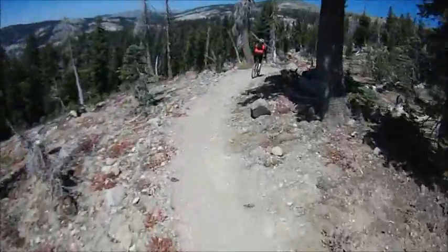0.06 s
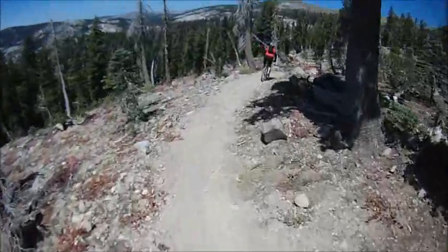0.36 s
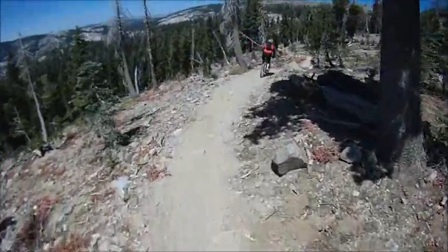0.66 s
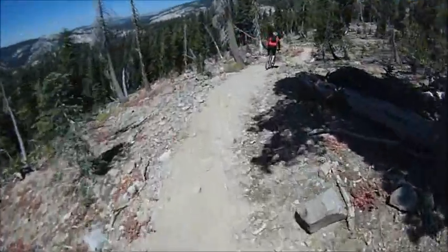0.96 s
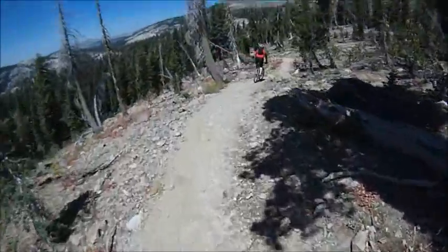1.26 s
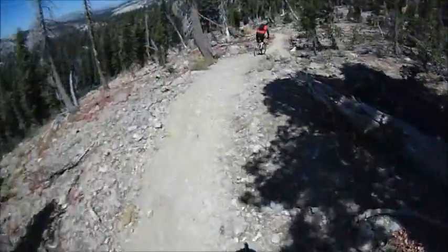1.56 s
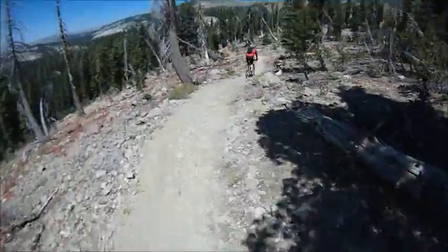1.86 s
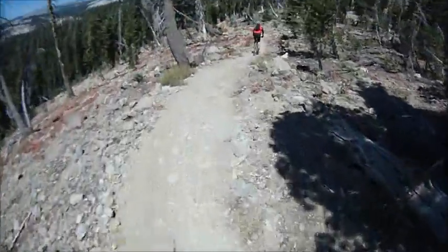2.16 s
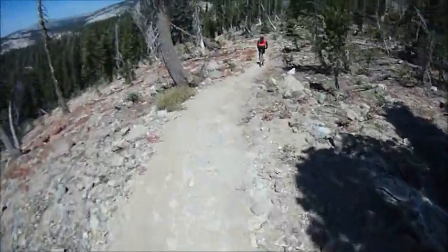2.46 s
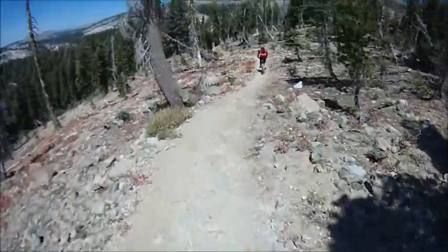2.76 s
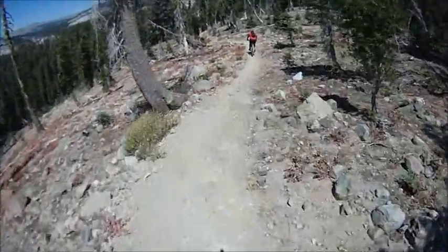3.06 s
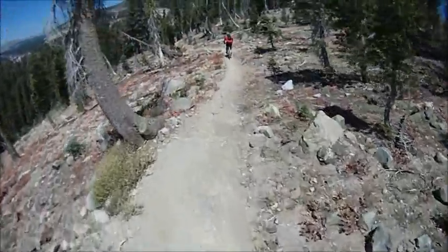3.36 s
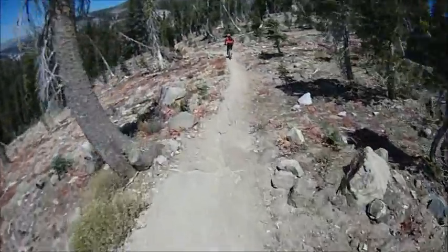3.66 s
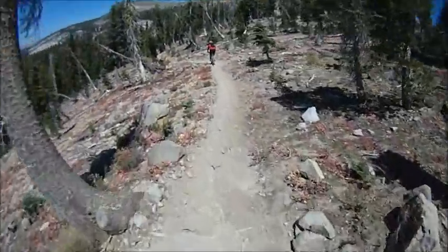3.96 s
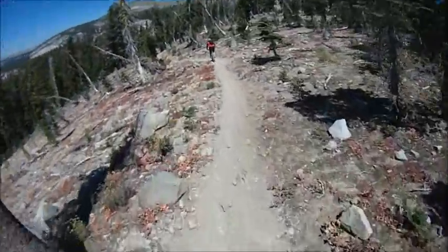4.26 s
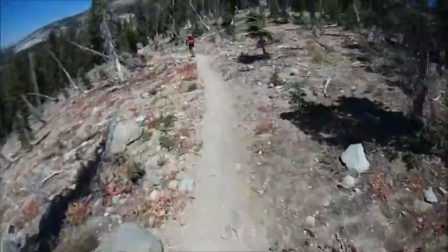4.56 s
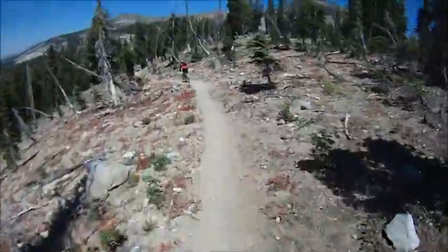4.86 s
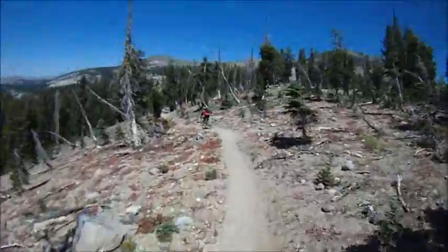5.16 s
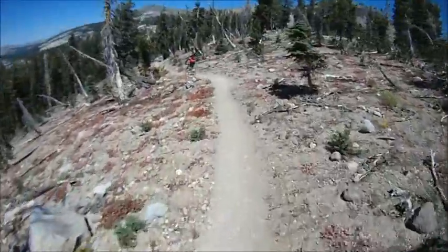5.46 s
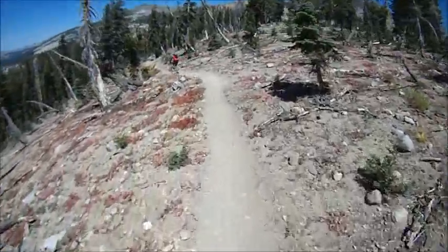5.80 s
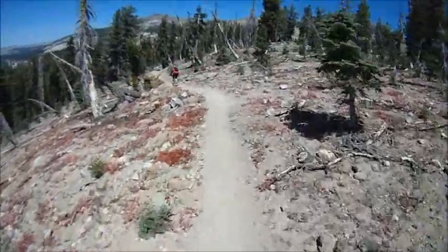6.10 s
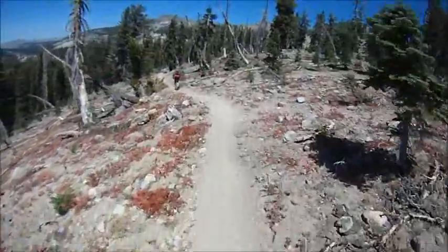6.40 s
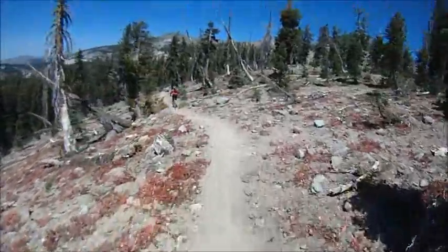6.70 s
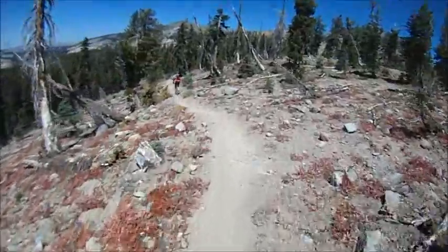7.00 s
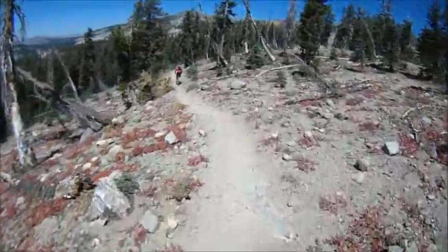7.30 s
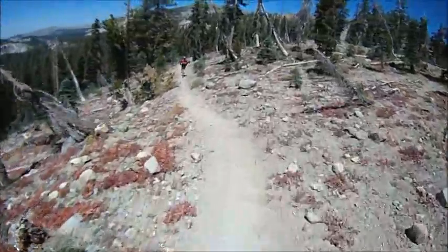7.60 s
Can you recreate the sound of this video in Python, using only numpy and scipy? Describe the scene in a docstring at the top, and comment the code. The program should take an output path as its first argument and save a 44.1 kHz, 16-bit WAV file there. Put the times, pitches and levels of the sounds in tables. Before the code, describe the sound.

Bike tyres grind over loose stones with clacks, thumps and rattles, between two spells of gusty wind on the microphone.

```python
"""A mountain bike runs down a dry gravel trail, heard from a cased camera on the rider.
At first, gusts batter the case with pops and short whistles while the tyres rumble and crunch.
From about 1 to 6 seconds, stones snap under the tread and knock the frame, the wheels thump into
ruts, the chain ticks and a hollow note rings after jolts. At about 6.5 seconds the gusts return.
A soft rush of air and a thin hiss lie under the whole ride."""
import sys
import numpy as np
from scipy import signal
from scipy.fft import rfft, irfft, next_fast_len
from scipy.io import wavfile
from scipy.ndimage import uniform_filter1d, map_coordinates

SR = 44100
rng = np.random.default_rng(int(sys.argv[2]) if len(sys.argv) > 2 else 0)


def bounce(signal):
    """Save signal as a 16-bit WAV file at the path given by the first command-line argument."""
    frames = np.transpose(np.atleast_2d(signal))
    limited = np.clip(frames, -1, 1)
    pcm = np.round(limited * 32767).astype(np.int16)
    wavfile.write(sys.argv[1], SR, pcm)


N = 341330
TIME = np.arange(N) / SR

# Levels in the tables are in decibels; some sources add an overall level of their own.
# how rough the trail is: (time [s], level [dB])
ROUGHNESS = [(0, -36.5), (.3, -38.5), (1.2, -36.5), (1.55, -40.5), (2.4, -39.5), (2.85, -39.5), (3.33, -45),
             (3.8, -41), (4.1, -41.5), (4.55, -40), (4.95, -46.5), (5.19, -45.5), (5.26, -38), (5.7, -39.5),
             (6.33, -37), (6.45, -32), (6.8, -38), (7.35, -32), (7.6, -40.5)]
# single bumps shake the bike: (time [s], level [dB])
BUMPS = [(.04, -37), (0.201, -36), (.3, -32.5), (.74, -34), (.85, -38.5), (1.05, -33), (1.169, -32.5),
         (1.66, -35.5), (1.79, -34), (2.049, -37), (2.24, -38), (2.679, -36.5), (3.091, -34), (3.19, -35.5),
         (3.409, -37), (3.6, -38.5), (3.905, -32.5), (4.315, -41.5), (4.37, -34.5), (4.47, -35.5),
         (4.53, -36.5), (5.88, -32.5), (5.975, -33.5), (6.17, -37), (7.05, -32), (7.31, -35), (7.42, -36)]
# how deep the loose gravel lies: (time [s], level [dB])
LOOSE_GRAVEL = [(0, -59.5), (.45, -66), (.8, -61), (1.35, -54.5), (2.3, -54), (2.5, -58), (3.25, -57.5),
                (3.65, -61), (3.95, -56.5), (4.78, -63.5), (5.3, -55.5), (5.6, -59.5), (5.74, -51),
                (6.39, -57), (6.7, -60.5)]
# the tread scatters a patch of stones: (time [s], length [s], level [dB])
SPRAYS = [(.73, 0.091, -56.5), (1.37, 0.02, -47), (1.435, 0.034, -47.5), (1.48, 0.047, -50),
          (1.82, 0.046, -52.5), (2.255, 0.078, -51), (3.105, 0.069, -52.5), (3.34, 0.078, -52),
          (3.56, 0.065, -55), (3.715, 0.041, -54), (3.92, 0.018, -50), (4.515, 0.071, -58),
          (4.9, 0.036, -52.5), (5.655, 0.024, -59), (5.97, 0.037, -51)]
# tone of the tyres' rumble, grind and crunch: (frequency [Hz], level [dB])
RUMBLE_SPECTRUM = [(20, -34), (45, -22.5), (80, -4.5), (160, 1.5), (280, 2), (380, -1.5), (520, -6.5),
                   (750, -14.5), (1200, -30.5), (3000, -84)]
GRIND_SPECTRUM = [(150, -19.5), (450, 5.5), (800, 1.5), (1200, -9), (1700, -11.5), (3000, -53)]
CRUNCH_SPECTRUM = [(300, -14), (800, -2), (1200, 0), (1700, -5), (2300, -12), (3000, -19.5), (4200, -29.5),
                   (7000, -44), (15000, -45)]
# pitches that the hollow bike and the case boost: (frequency [Hz], width [Hz], boost [dB])
BIKE_RESONANCES = [(414.5, 49, 13.5), (954, 67, 5)]
CASE_RESONANCES = [(920, 117, 10.5), (2220, 210, 4.5), (3450, 150, 8), (4700, 730, 5)]
# single stones snap out from under the tread: (time [s], level [dB], pitch [Hz])
STONE_SNAPS = [(1.714, -40, 1540), (1.983, -33, 1660), (2.009, -34.5, 1250), (2.048, -36, 1050),
               (2.081, -35, 1600), (2.183, -34.5, 1600), (2.279, -31.5, 1320), (2.347, -37, 1570),
               (2.386, -41, 1690), (2.689, -38, 1580), (3.0186, -36, 1850), (3.12, -34.5, 1700),
               (3.133, -35, 1460), (3.168, -34.5, 1470), (3.398, -38, 1200), (3.816, -38, 1720),
               (3.870, -34, 1600), (4.559, -40, 2200), (5.113, -36, 1440), (5.6521, -34, 1800),
               (5.986, -36, 1600), (6.031, -32.5, 1290)]
# stones and loose parts hit the frame: (time [s], level [dB], crack offset [dB], own pitch [Hz])
KNOCKS = [(1.3795, -15, -31, 923), (1.446, -24.5, -16, 880), (1.461, -28, -16, 1086),
          (1.7735, -17.5, -14.5, 973), (2.492, -28, -34, 945), (2.754, -28, -15, 950),
          (2.803, -35.5, -13, 830), (2.955, -30, -33, 930), (3.116, -31, -22, 884),
          (3.375, -30.5, -20, 1100), (3.541, -31, -16, 900), (3.721, -25.5, -31, 925),
          (4.519, -31.5, -13, 670), (4.531, -31.5, -24, 810), (4.704, -36, -20, 1270),
          (4.868, -34.5, -32, 753), (5.247, -34.5, -24, 805), (5.326, -30, -22, 680),
          (5.648, -24.5, -12, 1234), (5.657, -27.5, -19, 784), (6.117, -23, -18.5, 1005)]
# the notes of the struck frame: (pitch [Hz], level [dB], time to fade by 60 dB [s])
FRAME_MODES = [(408.6, -12.5, 0.23), (656, -7, 0.033), (945, -13, 0.11), (1203, -16.5, 0.087),
               (1572, -20.5, 0.055)]
# the wheels drop into ruts: (time [s], level [dB])
THUMPS = [(1.3792, -25), (1.437, -24.5), (1.827, -22.5), (2.685, -27), (2.899, -28), (2.986, -25),
          (3.003, -27), (3.428, -30.5), (3.716, -23.5), (4.325, -22), (4.389, -20), (4.44, -25.5),
          (4.519, -27), (4.745, -30), (5.639, -22), (5.875, -22.5)]
# jolts make the bike sound its hollow note: (time [s], length [s], level [dB])
JOLTS = [(1.353, 0.058, -27.5), (2.263, 0.072, -29), (2.341, 0.17, -34.5), (2.501, 0.11, -25),
         (2.675, 0.081, -27), (3.156, 0.086, -32), (3.242, 0.14, -33), (3.863, 0.26, -35),
         (4.295, 0.08, -32.5), (5.423, 0.059, -29), (5.66, 0.14, -34.5), (5.968, 0.052, -27.5)]
# chain and grit tick on the bike: (time [s], snap level [dB], treble level [dB])
TICKS = [(0.933, -52, -66), (1.201, -45, -77), (1.3747, -42, -62), (1.437, -40, -69), (1.828, -45, -64),
         (2.2606, -47, -66), (3.7494, -52, -69), (3.816, -43.5, -71), (3.871, -44.5, -75),
         (4.389, -46.5, -74), (4.9157, -46, -67), (4.9914, -48, -71), (5.65, -40, -71), (5.8356, -46, -72)]
# a spoke or brake disc pings: (time [s], pitch [Hz], level [dB])
PINGS = [(0.934, 3210, -49.5), (.934, 11500, -63), (1.376, 6640, -57), (1.460, 4650, -54),
         (1.828, 5140, -56), (2.262, 5060, -56), (2.296, 3500, -49), (4.532, 3440, -45)]
# gusts hit the case: (time [s], length [s], level [dB], sputter offset [dB])
GUSTS = [(.04, 0.058, -40, -6), (0.197, 0.176, -37.5, -4.5), (0.396, 0.398, -40.5, -8),
         (6.453, .1, -33.5, -4.5), (6.553, 0.141, -36.5, -3), (6.722, 0.017, -47, 8.5),
         (6.829, 0.058, -39, -10), (6.882, 0.066, -35.5, -1.5), (7.038, 0.036, -44.5, -3),
         (7.12, 0.077, -34.5, -1), (7.215, 0.261, -34, -3.5), (7.565, 0.024, -42.5, -3),
         (7.711, .036, -31, -11)]
# tone of the gusts' dull roar and sharp sputter: (frequency [Hz], level [dB])
ROAR_SPECTRUM = [(60, -30.5), (150, 0.5), (300, 4), (500, 3.5), (800, -5), (1250, -13.5), (1700, -41),
                 (2300, -40.5), (4000, -55), (8000, -102)]
SPUTTER_SPECTRUM = [(100, -21), (400, -1), (800, 6.5), (1300, -2), (1750, -15), (2250, -34.5), (4000, -60),
                    (8000, -74)]
# the hardest swirls of air slap the case: (time [s], level [dB])
SLAPS = [(.061, -22.5), (.081, -17.5), (.2185, -28), (.232, -27), (0.2859, -19), (.324, -24),
         (.3765, -20.5), (.739, -20), (6.481, -20), (6.534, -19), (6.5382, -21), (6.772, -24), (6.928, -18),
         (7.163, -19), (7.2447, -16.5), (7.301, -22), (7.4598, -17), (7.471, -18.5)]
# air whistles at an edge: (time [s], length [s], first pitch [Hz], last pitch [Hz], level [dB])
WHISTLES = [(0.049, 0.047, 489, 389, -27), (0.493, 0.065, 675, 698, -31.5),
            (1.052, 0.0235, 200, 696, -26.5), (6.851, 0.03, 850, 1160, -33.5),
            (7.122, 0.04, 1266, 1360, -34.5), (7.213, 0.043, 1222, 1090, -30.5),
            (7.509, 0.014, 900, 870, -27), (7.566, 0.039, 440, 690, -26.5), (7.618, 0.061, 740, 682, -31.5)]
# tone of the steady airflow and of the hiss: (frequency [Hz], level [dB])
AIRFLOW_SPECTRUM = [(15, -9.5), (80, 2), (140, -4), (400, -19), (2000, -88)]
HISS_SPECTRUM = [(500, 7.5), (3000, 3.5), (6000, 2.5), (9000, -0.5), (15000, -2)]
# how loud the hiss is: (time [s], level [dB])
HISS_LEVELS = [(0, -75), (.43, -80.5), (.8, -74), (1.26, -74), (1.7, -71), (3.95, -71.5), (4.75, -75.5),
               (5.33, -72), (5.8, -72.5), (6.28, -71), (6.58, -77), (7.5, -76)]


def shaking():
    """How hard the ground shakes the bike: the trail's roughness plus single bumps."""
    bumps = swells([(s, 0.035, db) for s, db in BUMPS], attack_s=0.0092, release_s=0.043)
    return np.hypot(amp(curve(ROUGHNESS)), bumps)


def moving_gravel():
    """How much gravel moves: the loose layer plus scattered patches of stones."""
    return np.hypot(amp(curve(LOOSE_GRAVEL)), swells(SPRAYS, attack_s=0.0025, release_s=0.015))


def tyre_rumble(shake, level_db=-0.93, judder_db=0.87):
    """Tyre knobs and bumps shake the bike, and the shaking travels up through the rider's mount."""
    knobs = coloured(impacts(rate=1500, spread_db=2.5), RUMBLE_SPECTRUM)
    return amp(level_db) * shake * unit(knobs * amp(judder_db * wobble(35)))


def tyre_grind(shake, gravel, level_db=2, shake_share=0.58, clump_db=1.0):
    """The tread presses stones into the dirt, harder on bumps and in deep gravel."""
    stones = impacts(rate=500, spread_db=1.5) + 0.5 * rng.standard_normal(N)
    clumps = stones * amp(clump_db * wobble(45))
    pressure = shake ** shake_share * gravel ** (1 - shake_share)
    return amp(level_db) * pressure * unit(coloured(clumps, GRIND_SPECTRUM, BIKE_RESONANCES))


def gravel_crunch(gravel, level_db=6, clump_db=1.75):
    """Grit snaps under the tread in clumps over a bed of sand, its tone always shifting."""
    grit = impacts(rate=650, spread_db=5) + 0.7 * rng.standard_normal(N)
    snaps = coloured(grit * amp(clump_db * wobble(55)), CRUNCH_SPECTRUM, CASE_RESONANCES)
    return amp(level_db) * gravel * unit(patchy(snaps, depth_db=2.5))


def stone_snaps(t60=0.021):
    """A pinched stone lets go with a dry clack: two short notes and a puff of grit."""
    out, t = np.zeros(N), TIME[:SR // 16]
    for s, db, hz in STONE_SNAPS:
        overtone = 0.39 * mode(t, hz * (1.3 + 0.15 * rng.standard_normal()), t60)
        grit = burst(t, lo_hz=hz / 2, hi_hz=hz * 1.17, t60=0.032)
        clack = (mode(t, hz, t60) + overtone + grit) * fade_in(t, 0.00057)
        add(out, s, amp(db) * unit_peak(clack))
    return out


def frame_knocks(crack_db=2, rebound_s=0.0052, rebound_db=-3):
    """Each blow rings the loose part and the frame; the part cracks against it and bounces once."""
    out, t = np.zeros(N), TIME[:SR // 4]
    for s, db, offset_db, own_hz in KNOCKS:
        ringing = 0.63 * mode(t, own_hz, t60=0.032)
        for hz, mode_db, t60 in FRAME_MODES:
            strength, detune = rng.standard_normal(2)  # no two blows sound alike
            ringing += amp(mode_db + 2 * strength) * mode(t, hz * (1 + 0.021 * detune), t60)
        ringing *= fade_in(t, 0.00052) ** 2  # a blunt contact builds up softly
        add(out, s, amp(db) * unit_peak(ringing))
        for contact in range(2):
            crack = burst(t, lo_hz=1160, hi_hz=2320, t60=0.023)
            add(out, s + contact * rebound_s, amp(db + offset_db + crack_db + contact * rebound_db) * crack)
    return out


def rut_thumps(level_db=-2, typical_hz=390):
    """A wheel drops with a dull jolt: one short push, then the suspension shudders."""
    out, t = np.zeros(N), TIME[:SR // 4]
    for s, db in THUMPS:
        hz = typical_hz * np.exp(0.15 * rng.standard_normal())
        push = mode(t, hz, t60=0.016) * fade_in(t, 0.002) ** 2
        shudder = 0.63 * burst(t, lo_hz=153, hi_hz=487, t60=0.088)
        add(out, s, amp(db + level_db) * (unit_peak(push) + shudder))
    return out


def hollow_ring(hz=417, waver_hz=9, level_db=-2, flutter_db=2.5):
    """The bike's hollow note swells quickly after a jolt and sinks more slowly."""
    loudness = np.zeros(N)
    for s, length, db in JOLTS:
        age = np.linspace(0, 1, int(length * SR))
        add(loudness, s, amp(db + level_db) * np.sin(np.pi * age ** 0.41))
    return loudness * tone(hz + waver_hz * wobble(50)) * amp(flutter_db * wobble(50))


def chain_ticks(snap_gain_db=-3, treble_gain_db=11):
    """Chain and grit tap the bike: a dry snap with a bright top."""
    out, t = np.zeros(N), TIME[:SR // 8]
    for s, snap_db, treble_db in TICKS:
        snap = burst(t, lo_hz=1800, hi_hz=4000, t60=0.025)
        treble = burst(t, lo_hz=4200, hi_hz=11500, t60=0.03, order=4)
        add(out, s, amp(snap_db + snap_gain_db) * snap + amp(treble_db + treble_gain_db) * treble)
    return out


def metal_pings(waver=0.023, t60=0.05):
    """A spoke or brake disc rings briefly; an unsteady pitch makes it gritty."""
    out, t = np.zeros(N), TIME[:SR // 8]
    for s, hz, db in PINGS:
        jitter = unit(uniform_filter1d(rng.standard_normal(len(t)), size=32))
        loudness = amp(db - 60 * t / t60) * fade_in(t, 0.001)
        add(out, s, loudness * tone(hz * (1 + waver * jitter)))
    return out


def wind_gusts(roar_db=2.5, flutter_db=0.45):
    """Swirls of air batter the case: a dull, fluttering roar with a sharper sputter."""
    swirls = impacts(rate=1400, spread_db=5) + 0.5 * rng.standard_normal(N)
    roar = coloured(swirls, ROAR_SPECTRUM)
    sputter = coloured(impacts(rate=170, spread_db=1.5), SPUTTER_SPECTRUM)
    dull = [(s, length, db + roar_db) for s, length, db, _ in GUSTS]
    sharp = [(s, length, db + offset_db) for s, length, db, offset_db in GUSTS]
    out = np.zeros(N)
    for rows, air in [(dull, roar), (sharp, sputter)]:
        out += swells(rows, attack_s=0.01, release_s=0.0096) * unit(air)
    return out * unit(amp(flutter_db * wobble(60)))


def wind_slaps(typical_hz=460, width_s=0.0012):
    """One hard swirl of air sucks at the case: a hollow pop, a wave or two long."""
    out, t = np.zeros(N), TIME[:SR // 50]
    middle = t.mean()
    bell_shape = np.exp(-((t - middle) / width_s) ** 2)
    for s, db in SLAPS:
        hz = typical_hz * np.exp(0.12 * rng.standard_normal())
        pop = -np.cos(2 * np.pi * hz * (t - middle)) * bell_shape
        add(out, s - middle, amp(db) * pop)
    return out


def wind_whistles(level_db=-2, waver=0.074):
    """Air rushing past an edge makes short, sliding notes."""
    out, drift = np.zeros(N), 1 + waver * wobble(313)
    for s, length, first_hz, last_hz, db in WHISTLES:
        count = int(length * SR)
        hz = np.linspace(first_hz, last_hz, count) * drift[:count]
        add(out, s, amp(db + level_db) * np.hanning(count) ** 0.5 * tone(hz))
    return out


def airflow(level_db=-51):
    """Air flows steadily past the rider with a soft, low rush."""
    return amp(level_db) * unit(coloured(rng.standard_normal(N), AIRFLOW_SPECTRUM))


def hiss(level_db=4, width=0.48):
    """A thin hiss, the only sound that differs between the ears."""
    mid, side = unit(coloured(rng.standard_normal((2, N)), HISS_SPECTRUM))
    return amp(curve(HISS_LEVELS) + level_db) * np.array([mid + width * side, mid - width * side])


def amp(db):
    """Turn decibels into a number to multiply by."""
    return 10 ** (np.asarray(db) / 20)


def unit(x):
    """Scale x to an average strength (rms) of 1."""
    return x / np.sqrt(np.mean(x ** 2) + 1e-20)


def unit_peak(x):
    """Scale x so its biggest swing is 1."""
    return x / np.abs(x).max()


def add(track, s, sound):
    """Mix a sound into the track at s seconds."""
    part = track[round(s * SR):][:len(sound)]
    part += sound[:len(part)]


def curve(rows):
    """Join (time [s], value) rows with straight lines."""
    return np.interp(TIME, *np.transpose(rows))


def wobble(rate):
    """A smooth random curve through `rate` points a second."""
    return map_coordinates(rng.standard_normal(int(N * rate / SR) + 4), [TIME * rate])


def fade_in(t, rise_s):
    """Climb from 0 towards 1, fast at first."""
    return 1 - np.exp(-t / rise_s)


def swells(rows, attack_s, release_s):
    """Loudness of (time [s], length [s], level [dB]) events that rise, hold and die away."""
    power, t = np.zeros(N), TIME[:SR]
    for s, length, db in rows:
        rise = np.minimum(t / attack_s, 1)
        fall = np.exp(-np.maximum(t - length, 0) / release_s)
        add(power, s, (amp(db) * rise * fall) ** 2)
    return np.sqrt(power)


def tone(hz):
    """A pure note that follows a changing pitch."""
    return np.sin(2 * np.pi * np.cumsum(hz) / SR)


def mode(t, hz, t60):
    """One note of a struck object, fading by 60 dB in t60 seconds."""
    return np.sin(2 * np.pi * hz * t) * amp(-60 * t / t60)


def burst(t, lo_hz, hi_hz, t60, order=3):
    """A dying puff of noise between two frequencies."""
    band = signal.butter(order, [lo_hz, hi_hz], "band", fs=SR, output="sos")
    return unit_peak(signal.sosfilt(band, rng.standard_normal(len(t)) * amp(-60 * t / t60)))


def impacts(rate, spread_db):
    """Clicks of random time and size, about `rate` a second."""
    chance, size, sign = rng.random(N), rng.standard_normal(N), rng.choice([-1, 1], N)
    return unit((chance < rate / SR) * sign * amp(spread_db * np.clip(size, -2, 2)))


def coloured(x, spectrum, resonances=()):
    """Filter x to give it the tone of a spectrum table, plus any resonances."""
    size = 2 * next_fast_len(N // 2 + 8192)
    hz = np.fft.rfftfreq(size, 1 / SR)
    point_hz, point_db = np.transpose(spectrum)
    smooth_db = np.interp(np.log(hz + 1), np.log(point_hz + 1), point_db)
    boost_db = sum(db / (1 + (2 * (hz - centre) / width) ** 2) for centre, width, db in resonances)
    # fold the filter so that it rings after each click, never before
    cepstrum = irfft(np.log(amp(smooth_db + boost_db)))
    cepstrum[1:size // 2] *= 2
    cepstrum[size // 2 + 1:] = 0
    return irfft(rfft(x, size) * np.exp(rfft(cepstrum)), size)[..., :N]


def patchy(x, depth_db):
    """Change the tone of x at random from moment to moment."""
    slices = signal.stft(x, nperseg=512)[2]
    patches = uniform_filter1d(rng.standard_normal(slices.shape), size=4, axis=0)  # blur in pitch
    patches = uniform_filter1d(patches, size=5, axis=1)  # blur in time
    return signal.istft(slices * amp(depth_db * unit(patches)), nperseg=512)[1][:N]


def scene():
    """The closed case passes bike and wind to both channels alike."""
    shake, gravel = shaking(), moving_gravel()
    tyres = tyre_rumble(shake) + tyre_grind(shake, gravel) + gravel_crunch(gravel) + stone_snaps()
    bike = hollow_ring() + frame_knocks() + rut_thumps() + chain_ticks() + metal_pings()
    air = airflow() + wind_gusts() + wind_slaps() + wind_whistles()
    return tyres + bike + air + hiss()


def record(dry):
    """The camera cuts off the very highest treble."""
    size = next_fast_len(N + SR // 2)
    hz = np.fft.rfftfreq(size, 1 / SR)
    return irfft(rfft(dry, size) * (hz < 15300), size)[..., :N]


dry = scene()
out = record(dry)
bounce(out)
```